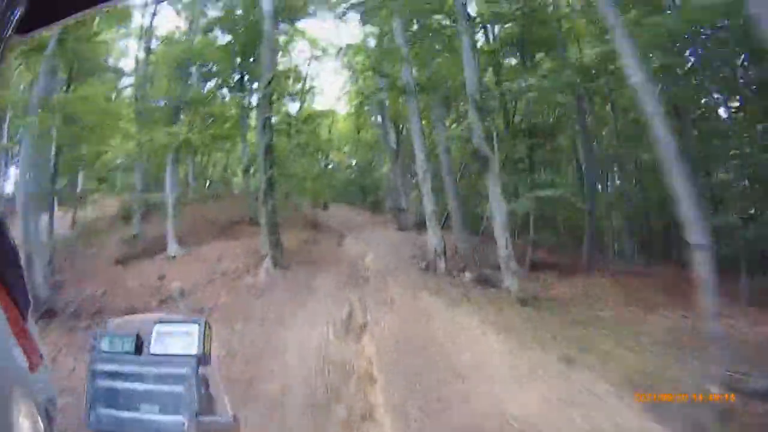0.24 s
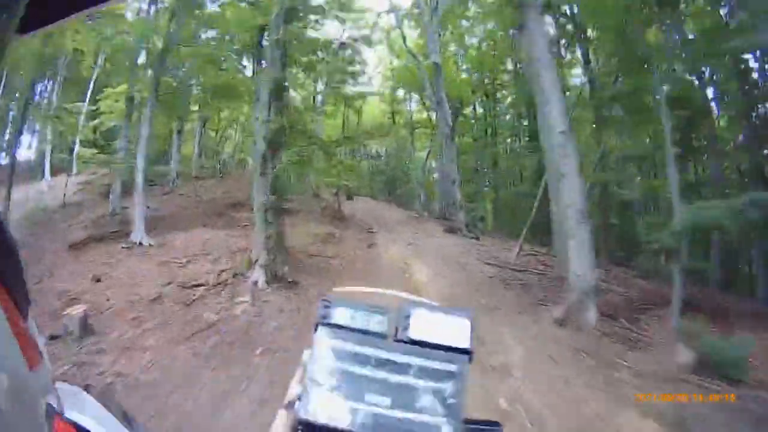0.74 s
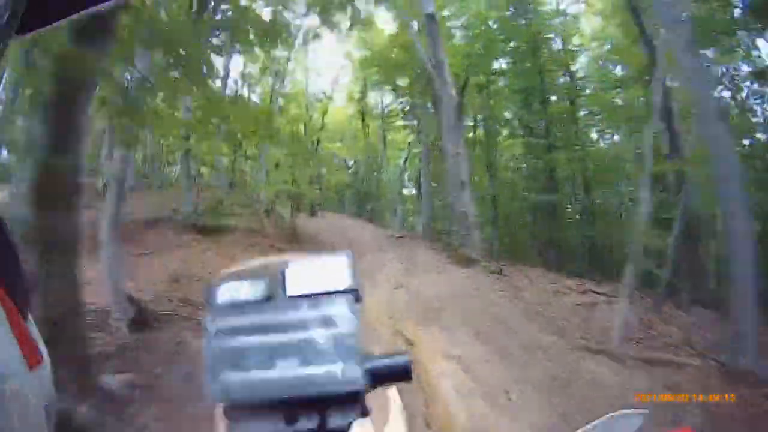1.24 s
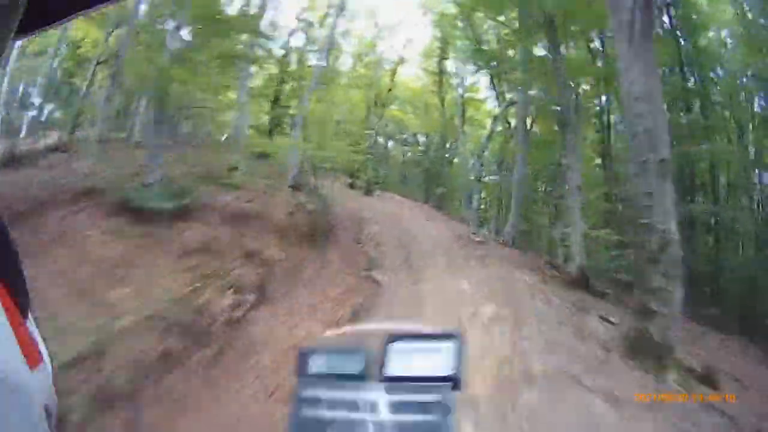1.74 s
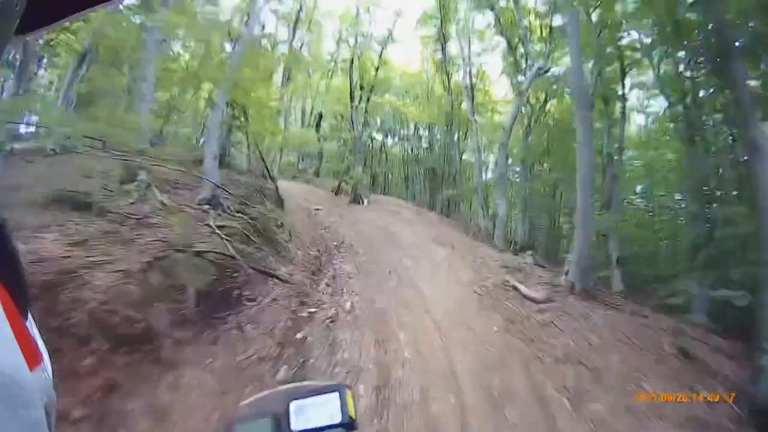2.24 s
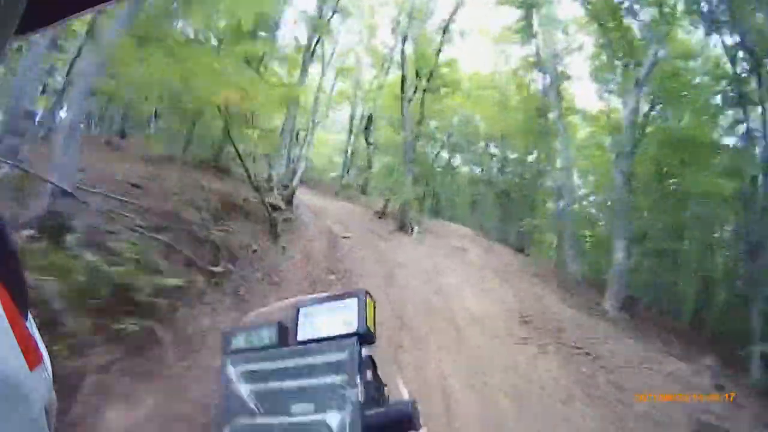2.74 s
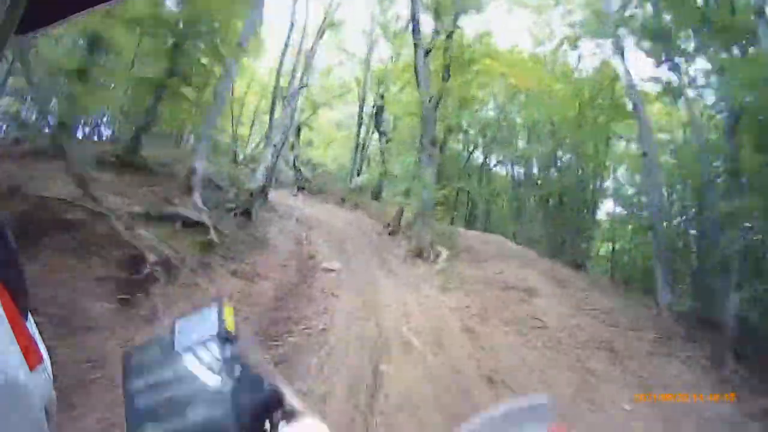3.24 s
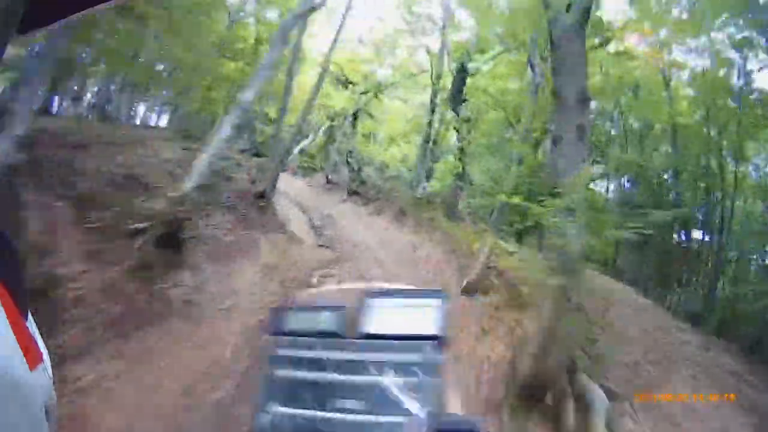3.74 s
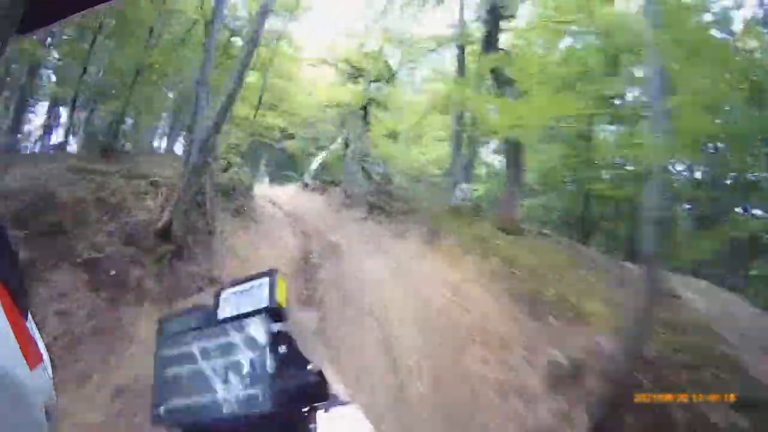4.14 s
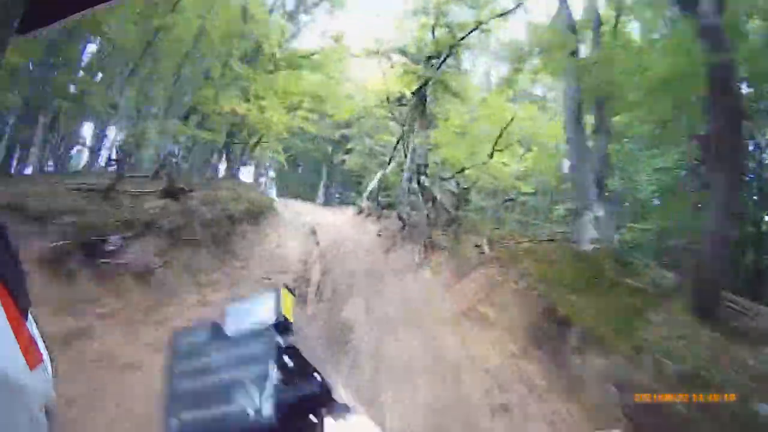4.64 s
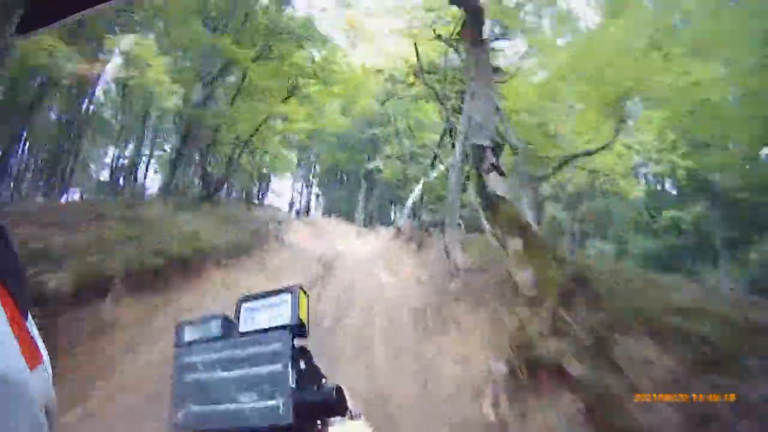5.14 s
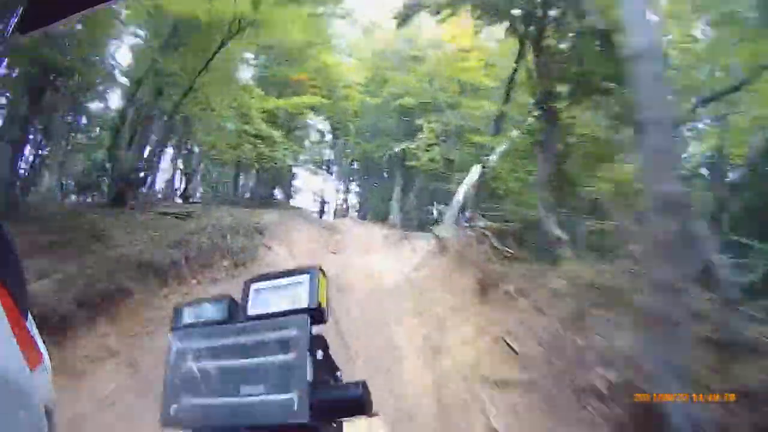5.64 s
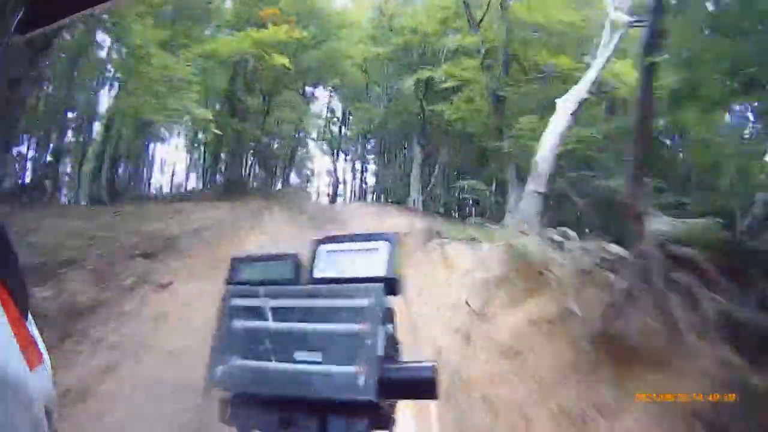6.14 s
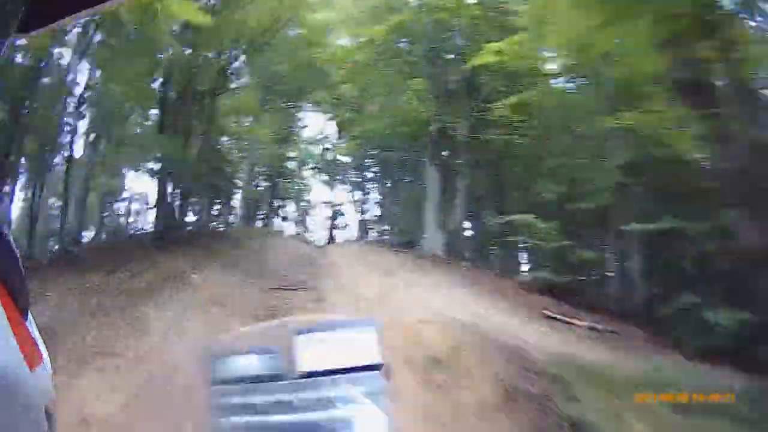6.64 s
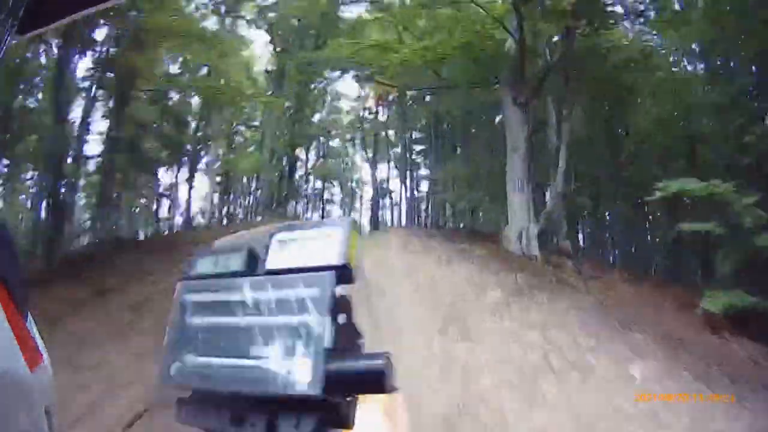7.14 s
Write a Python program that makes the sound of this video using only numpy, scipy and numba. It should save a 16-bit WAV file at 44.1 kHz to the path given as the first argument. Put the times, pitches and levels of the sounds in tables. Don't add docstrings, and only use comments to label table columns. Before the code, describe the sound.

A single-cylinder four-stroke motorcycle climbs a rough forest track, heard close through a closed case riding with the microphone. From 0 to 2 seconds the low, throaty exhaust boom pulls and rises in pitch, fluttering as the rear wheel grips and slips. Just after 2 the throttle shuts; the engine sinks into a weaker, uneven burble, with small blips around 3 to 3.5. From about 3.9 it pulls again, strengthening after 4.6 and surging to its highest, loudest revs around 5.8 to 6.2. At 6.3 it cuts sharply, stumbles, then builds to the end at 7.4. Casing rattle and airy hiss pulse with the strokes above dull wind, tyre roar and trail rumble. Soft low thuds mark bumps, notably near 0.5, 2.7, 3.9 and 6.4 to 6.7; tiny grit ticks scatter throughout. A very faint gear whine creeps upward around 4.3 to 4.6.

```python
import sys
import numpy as np
from scipy import signal
from scipy.io import wavfile
from scipy.ndimage import uniform_filter1d
from numba import njit

SR = 44100
rng = np.random.default_rng(int(sys.argv[2]) if len(sys.argv) > 2 else 0)


def rack_gain(trim_db):
    fader = np.asarray(trim_db, float)
    return 10 ** (fader / 20)


def waveform_to_disk(signal):
    frames = np.transpose(np.atleast_2d(signal))
    scaled = np.clip(frames, -1, 1) * 32767
    samples = np.round(scaled).astype(np.int16)
    wavfile.write(sys.argv[1], SR, samples)


N = 326340

# t/s, peak level/dB, centre f/Hz, ring time/s
TICKS = [(0.1083, -42.5, 5530, 0.044), (0.3702, -40, 5080, 0.018), (0.4806, -38, 4943, 0.025),
         (0.533, -40.5, 5090, 0.019), (1.0102, -40, 5120, 0.034), (1.084, -43, 4900, 0.038),
         (1.204, -35, 4273, 0.011), (1.4255, -37, 5420, 0.022), (1.4738, -38, 4620, 0.057),
         (1.538, -36, 4868, 0.026), (1.847, -36, 4648, 0.036), (2.377, -42, 5360, 0.031),
         (2.476, -48, 4330, 0.029), (3.1933, -57, 5000, 0.039), (3.2888, -43, 5193, 0.025),
         (3.4074, -40.5, 4645, 0.034), (3.916, -48, 5477, 0.016), (3.955, -38, 4548, 0.048),
         (4.171, -41, 4533, 0.035), (4.218, -49, 4930, 0.037), (4.5146, -40, 4723, 0.033),
         (4.6903, -37, 4607, 0.032), (5.0192, -48, 5154, 0.045), (5.14, -39, 5170, 0.045),
         (5.169, -37, 4736, 0.046), (5.491, -34.5, 4516, 0.049), (5.6769, -32.5, 4926, 0.023),
         (6.24, -41, 4890, 0.039), (6.6655, -31, 5310, 0.012)]
# t/s, peak level/dB, f/Hz, ring time/s
THUDS = [(0.324, -31, 149, 0.045), (0.535, -26.5, 132, 0.065), (1.44, -29, 140, 0.076),
         (2.302, -39, 139.6, 0.058), (2.576, -38, 143, 0.15), (2.699, -28, 129.2, 0.081),
         (3.006, -32, 124.6, 0.073), (3.568, -31, 122, 0.091), (3.758, -36, 145.8, 0.13),
         (3.912, -24, 131.1, 0.098), (4.11, -35, 86.8, 0.092), (4.298, -35, 142.2, 0.1),
         (4.654, -30, 112, 0.12), (5.507, -41, 118.6, 0.12), (6.415, -27, 147.2, 0.11),
         (6.599, -24.5, 147, 0.13), (6.694, -27, 138.1, 0.11), (6.899, -35, 146, 0.11)]
FULL_LOAD_DB, CRUISE_HZ = -12, 38
SNAP_LAG = -.03


@njit
def svf(x, hz, width):
    y, band, low = np.empty(len(x)), 0., 0.
    g, k = np.tan(np.pi * hz / SR), width / hz
    for i in range(len(x)):
        v = (band + g * (x[i] - low)) / (1 + g * (g + k))
        band, low, y[i] = 2 * v - band, low + 2 * g * v, k * v
    return y


def steep(x, hz, width):
    return svf(svf(x, 1. * hz, 1. * width), 1. * hz, 1. * width)


def unit(x):
    return x / np.sqrt(np.mean(x ** 2))


def ring(x, modes):
    return sum(sign * rack_gain(db) * steep(x, hz, 1.5 * width) for hz, width, db, sign in modes)


def walk(rate):
    k = int(SR / rate)
    held = np.repeat(rng.standard_normal(N // k + 1), k)
    return 1.27 * uniform_filter1d(uniform_filter1d(held, k), k)[:N]


def coloured(points, flicker_db, rate):
    hz, db = np.transpose(points)
    bands = hz[0] * 2 ** np.arange(0, np.log2(hz[-1] / hz[0]), 1 / 4)
    gains = rack_gain(np.interp(np.log(bands), np.log(hz), db))
    total = np.zeros(N)
    for f, gain in zip(bands, gains):
        total += gain * rack_gain(flicker_db * walk(rate)) * steep(rng.standard_normal(N), f, f / 3)
    return unit(total)


def follows(hz, load_db, base_db, per_load_db, db_per_hz):
    return base_db + per_load_db * (load_db - FULL_LOAD_DB) + db_per_hz * (hz - CRUISE_HZ)


def stirred(t, table, width_s):
    return np.max([np.exp(-((t - row[0]) / width_s) ** 2) for row in table], axis=0)


def knocks(table, sharp, tonal, noisy, gain_db):
    out = np.zeros(N + SR)
    t = np.arange(SR // 4) / SR
    for s, peak_db, hz, t60 in table:
        noise = unit(steep(rng.standard_normal(len(t)), hz, 1.1 * hz))
        body = tonal * np.sin(2 * np.pi * hz * t) + noisy * noise
        shape = np.minimum(t * hz / sharp, 1) * 1000. ** (-t / max(t60, .005))
        out[int(s * SR):][:len(t)] += rack_gain(peak_db + gain_db) * shape * body
    return out[:N]


def hunting(load_db):
    return rack_gain(-.5 * (load_db - FULL_LOAD_DB))


def rider(t):
    # t/s, firing rate f/Hz
    speed = [(0.0, 32.52), (0.06, 33.1), (0.14, 34.6), (0.4, 34.6), (0.52, 36.32), (0.68, 36.2),
             (0.73, 37.27), (0.83, 36.42), (1.21, 41.91), (1.36, 39.55), (1.45, 40.13), (1.54, 44.3),
             (1.62, 40.9), (1.71, 39.58), (1.79, 42.17), (1.88, 40), (1.96, 42.22), (2.08, 39.53),
             (2.19, 38.93), (2.4, 35.85), (2.61, 35.52), (2.77, 33.38), (3.03, 38.43), (3.08, 37.6),
             (3.18, 38.63), (3.54, 33.7), (3.77, 33.6), (3.92, 36.27), (4.08, 34.08), (4.13, 35.34),
             (4.18, 35.14), (4.25, 36.35), (4.39, 34.64), (4.48, 34.76), (4.58, 36.5), (4.69, 36.04),
             (4.73, 35.17), (4.81, 35.0), (4.92, 35.5), (5.05, 38.97), (5.17, 39.23), (5.22, 37.37),
             (5.28, 38.04), (5.41, 35.07), (5.52, 38.8), (5.65, 39.48), (6.0, 48.87), (6.18, 48.05),
             (6.25, 45.34), (6.33, 37.73), (6.4, 35.08), (6.55, 37.68), (6.67, 36.25), (6.83, 40.96),
             (6.9, 40.4), (6.97, 42.6), (7.03, 41.08), (7.22, 41.9), (7.3, 44.8), (7.4, 44.34)]
    # t/s, load level/dB, lean of the boom toward its lower multiple/dB
    throttle = [(0, -15, -9), (.3, -16.5, -4.5), (.62, -16, -4.5), (.82, -14, -5), (1, -13.5, 3),
                (1.2, -12.5, 6), (1.38, -12.5, -2), (1.559, -12.5, 9.5), (1.69, -13.5, 1.5), (1.86, -11, 3),
                (1.96, -13, 7), (2.01, -19, -11), (2.05, -27, -7), (2.09, -30, 7), (2.17, -27.5, 13),
                (2.26, -23.5, -13.5), (2.44, -24, -11), (2.509, -24, -17), (2.72, -25, -5),
                (2.93, -19, -6.5), (3.11, -22, -9.5), (3.181, -18.5, -8.5), (3.269, -16, 7),
                (3.37, -19, -15), (3.65, -24, -5), (3.79, -19.5, -13), (3.86, -22.5, -8), (3.93, -17.5, -2),
                (4.08, -16, -14), (4.14, -17, -7), (4.2, -16.5, -6), (4.319, -17, -2), (4.38, -16, -10.5),
                (4.58, -18, 2.5), (4.66, -13.5, -6.5), (4.76, -12, -7.5), (4.99, -12.5, -3),
                (5.05, -12, 10), (5.109, -14.5, 6), (5.16, -13.5, 1.5), (5.26, -13.5, 5), (5.41, -12.5, -8),
                (5.53, -11.5, 5.5), (5.66, -11, 6.5), (5.82, -8, 12.5), (5.95, -10, 13), (6.1, -12.5, 18.5),
                (6.255, -10, 15.5), (6.275, -20.5, 4), (6.33, -17, -11), (6.411, -24, -4),
                (6.47, -16.5, -11), (6.671, -18.5, 7.5), (6.83, -14.5, -7), (6.95, -12, 5), (7.1, -10.5, 5),
                (7.24, -11.5, 9), (7.3, -10.5, 14), (7.4, -9.5, 12)]
    # t/s, gulp strength against the pop [-1 to 1], snap level of the pop/dB
    breath = [(0, 0.71, -0.5), (.4, 0.99, -0.5), (.62, 0.98, -8), (.72, 0.22, 3), (.84, 0.46, -6),
              (1.03, 1, 0), (1.15, 0.62, 0), (1.24, -0.31, -4.5), (1.37, 1, 2), (1.55, 0.17, 2),
              (1.69, 0.79, 0), (1.8, 0.21, 2), (1.96, -0.073, 3), (2.13, -0.15, -1), (2.5, 0.11, -0.5),
              (2.93, -0.26, 3.5), (3.1, 0.0023, -3.5), (3.25, -0.65, 1), (3.6, 0.46, -9),
              (3.93, -0.016, -0.5), (4.08, 0.52, -2), (4.15, 0.068, 1.5), (4.4, 0.054, 1.5),
              (4.58, 0.027, 2), (4.66, 0.38, -2), (4.76, 0.45, -1), (4.99, 0.69, 1), (5.05, -0.031, 3),
              (5.27, -0.0052, 3.5), (5.34, 0.57, 0), (5.45, 0.43, 3.5), (5.6, 0.84, 2), (5.73, 0.9, -1),
              (5.85, 0.89, -0.5), (5.98, 0.28, -0.5), (6.2, -0.23, 1.5), (6.31, -0.18, 1.5),
              (6.5, -0.22, 1), (6.68, -0.086, 3.5), (6.83, -0.33, -0.5), (7.05, 0.029, -0.5),
              (7.24, 0.36, 2), (7.32, -0.063, -4), (7.4, -0.2, 6)]
    hand_s, load_db, lean_db = np.transpose(throttle)
    load_db, lean_db = np.interp(t, hand_s, load_db), np.interp(t, hand_s, lean_db)
    breath_s, gulp, snap_db = np.transpose(breath)
    gulp_leak = 0.12
    gulp = np.clip(np.interp(t, breath_s, gulp) - gulp_leak, -.9, .99)
    hz = np.interp(t, *np.transpose(speed)) + .05 * walk(11) * hunting(load_db)
    controls = hz, load_db, lean_db, np.interp(t, breath_s, snap_db), gulp
    return [uniform_filter1d(c, size=500) for c in controls]


def boom_multiples(load_db, lean_db, gulp):
    k = np.array([[6], [7], [8]])
    uneven_db = .9 * hunting(load_db) * np.array([walk(16) for _ in k])
    share = (1 + gulp * (-1) ** k) * rack_gain(lean_db * (7 - k) / 2) * rack_gain(uneven_db)
    return load_db + 10 * np.log10(share ** 2 / np.sum(share ** 2, axis=0))


def crank(hz, slack):
    turns = np.cumsum(hz) / SR
    chance = rng.standard_normal((N // 400, 2))[turns.astype(int)].T
    size = uniform_filter1d(rack_gain(.8 * slack * chance[0]), size=300)
    turns = turns + uniform_filter1d(.007 * slack * chance[1], size=600)
    return turns + .011 * walk(18), size


def exhaust(hz, turns, slack, boom_db, boom, bark_db):
    # f/Hz, level/dB of the multiples outside the boom
    pipe = [(40, -42), (80, -26.5), (120, -28.5), (165, -28), (205, -13.5), (260, 1), (320, -5.5),
            (360, -16), (430, -13), (500, -11), (600, -16.5), (800, -28.5), (950, -27.5), (1150, -24.5),
            (1450, -36.5)]
    # multiple of the cycle rate, level/dB
    trim = [(2, -1), (3, -8.5), (4, -1.5), (5, 0), (9, -4.5), (10, 1.5), (11, 4.5), (12, -3), (13, 3.5),
            (14, -3)]
    # t/s, lead of the seventh multiple/turns
    sway = [(0, .25), (.6, .27), (.72, .72), (.98, .72), (1.1, 1.19), (1.4, 1.19), (1.55, 1.12),
            (1.98, 1.1), (2.1, .95), (3.95, .97), (4.08, 1.27), (4.58, 1.27), (4.68, 1.75), (4.98, 1.7),
            (5.08, 2.12), (5.2, 2.12), (5.28, 1.7), (5.58, 1.68), (5.7, 2.03), (6.2, 1.95), (6.5, 2.05),
            (6.95, 2.09), (7.1, 2.16), (7.4, 2.16)]
    pipe_hz, pipe_db = np.transpose(pipe)
    warble = np.interp(np.arange(N) / SR, *np.transpose(sway))
    strongest = dict(zip((6, 7, 8), boom_db))
    ninth_db = -0.13 * (boom_db[0] - boom_db[2])
    total = 0
    for k in range(1, 35):
        if k in strongest:
            level = rack_gain(strongest[k])
        else:
            shape_db = np.interp(np.log(k * hz), np.log(pipe_hz), pipe_db) + dict(trim).get(k, 0)
            shape_db = shape_db + (k == 9) * ninth_db
            level = (boom if k < 10 else rack_gain(bark_db)) * rack_gain(shape_db + .07 * k * walk(12))
        wander = .001 * k * walk(25) + (.25 if k < 10 else .15) / k * walk(4)
        if k < 10:
            lead = {5: .3, 7: warble, 9: .38 / slack}.get(k, .1 * k ** 2 * (k < 5))
        else:
            lead = -SNAP_LAG * k - .02 * min(k - 12, 5) ** 2 + .13 * (k % 2) * (k < 22)
        phase = k * (2 * np.pi * turns + wander) + 2 * np.pi * lead
        total = total + np.sqrt(2) * level * np.cos(phase)
    return total


def strokes(turns):
    pop = 0.79 * np.exp(-((turns - SNAP_LAG + .12) % 1) / 0.33)
    gulp = .5 * np.exp(-((turns - SNAP_LAG - .5) % 1) / 0.13)
    return 0.5 + pop + gulp


def gas_churn(gate, slack, boom):
    # f/Hz, width/Hz, level/dB, sign
    gas = [(226, 71, -6, 0.73), (293.4, 15, -5, -2.2), (486, 140, -9, 0.93)]
    return rack_gain(-16) * slack ** .8 * boom * unit(ring(np.sqrt(gate) * rng.standard_normal(N), gas))


def casing_rattle(gate, level_db):
    # f/Hz, width/Hz, level/dB, sign
    casing = [(1115, 170, 0, 0.95), (1224, 310, -5, -0.61), (764, 95, 0, -0.47), (454.6, 160, 4, 1),
              (1024, 100, -4.5, -0.84), (899, 140, -8, 0.99), (1456, 240, -10.5, 1),
              (1624, 220, -21.5, -1.1), (2247, 292, -18.5, 0.93), (3736, 220, -25.5, -0.7)]
    grains = rack_gain(2 * walk(60)) * rng.standard_normal(N)
    return rack_gain(level_db + 4.0) * unit(ring(gate * grains, casing))


def engine(hz, boom_db, bark_db, rattle_db):
    boom = np.sqrt(np.sum(rack_gain(2 * boom_db), axis=0))
    slack = np.clip(rack_gain(FULL_LOAD_DB - 2) / boom, 1, 3)
    turns, size = crank(hz, slack)
    gate = strokes(turns)
    pops = size * exhaust(hz, turns, slack, boom_db, boom, bark_db)
    return pops + gas_churn(gate, slack, boom) + casing_rattle(gate, rattle_db), gate


def gas_hiss(t, hz, load_db, jolt_db, gate):
    # f/Hz, level/dB per Hz
    spectrum = [(880, -30.5), (1500, -1.5), (1770, -5.5), (1960, -8), (2280, -12), (3120, -16),
                (3750, -14.5), (8080, -33), (11000, -39.5), (14300, -61), (22000, -120)]
    late_db = np.interp(t - 0.058, t, load_db)
    level_db = follows(hz, late_db, -47, per_load_db=0.51, db_per_hz=0.2) + jolt_db + 7.0
    hiss = unit(gate ** 0.5 * coloured(spectrum, flicker_db=1.7, rate=8))
    return rack_gain(level_db + 0.57 * walk(18)) * hiss


def wind_roar():
    # f/Hz, level/dB per Hz
    spectrum = [(15, -46), (25, -24.5), (129, -13.5), (248, 1), (381, -2), (519, -7), (585, -13.5),
                (945, -16), (1180, -20.5), (1500, -21), (1950, -53), (3300, -120)]
    return rack_gain(-27.5) * coloured(spectrum, flicker_db=1.6, rate=8.9)


def trail_rumble(t, hz, load_db):
    noise = rng.standard_normal(N) * rack_gain(1.8 * walk(14))
    shake_db = 5 * stirred(t, THUDS, width_s=0.057)
    level_db = follows(hz, load_db, -35.5, per_load_db=0.19, db_per_hz=0.082) + shake_db - 1.5
    return rack_gain(level_db) * unit(svf(svf(noise, 140.0, 98.0), 87.0, 130.))


def grit_ticks():
    return knocks(TICKS, sharp=6, tonal=0, noisy=1, gain_db=-4)


def bump_thuds():
    return knocks(THUDS, sharp=0.69, tonal=1, noisy=0.54, gain_db=3.0)


def gear_whine(t):
    start, end = 4.3, 4.58
    swell = np.clip(np.minimum(t - start, end - t) / .04, 0, 1) * rack_gain(-54.5 + 1.8 * walk(15))
    hz = np.interp(t, [start, end], [3650, 3735]) + 8 * walk(25)
    return swell * np.sin(2 * np.pi * np.cumsum(hz) / SR)


def scene():
    t = np.arange(N) / SR
    hz, load_db, lean_db, snap_db, gulp = rider(t)
    jolt_db = 0 * stirred(t, TICKS, width_s=.07)
    boom_db = boom_multiples(load_db, lean_db, gulp)
    bark_db = follows(hz, load_db, -18.5, per_load_db=0.76, db_per_hz=-0.19) + snap_db + 1.0 * walk(11)
    rattle_db = follows(hz, load_db, -27, per_load_db=0.33, db_per_hz=0.28)
    rattle_db = rattle_db + 0.46 * jolt_db + 1.0 * walk(9.9)
    bike, gate = engine(hz, boom_db, bark_db, rattle_db)
    air = gas_hiss(t, hz, load_db, jolt_db, gate) + wind_roar()
    trail = trail_rumble(t, hz, load_db) + grit_ticks() + bump_thuds()
    fade_in = np.minimum(t / .004, 1)
    return (fade_in * (bike + air + trail + gear_whine(t)))[None]


def coarse_treble(x, coarse):
    hz, _, z = signal.stft(x, SR, "cosine", 2048, boundary="odd", padded=False)
    size = np.abs(z) + 1e-12
    bands = rng.standard_normal((len(hz) // 16 + 1, z.shape[-1]))
    bands = np.repeat(bands, 16, axis=0)[:len(hz)]
    bands = uniform_filter1d(bands, size=2, axis=1)
    tilt = np.clip(hz[:, None] / 7000, .05, 1)
    step = coarse * tilt * rack_gain(4.2 * bands) * uniform_filter1d(size, size=32, axis=-2)
    rounded = z * np.round(size / step) * step / size
    out = signal.istft(rounded, SR, "cosine", 2048)[1]
    return np.concatenate([out, x[:, out.shape[1]:]], axis=1)


def low_pass(x):
    return signal.sosfilt(signal.butter(12, 16830, fs=SR, output="sos"), x)


def record(dry):
    drive = uniform_filter1d(np.abs(dry), size=4000)
    hissy = dry + rack_gain(-66.5) * (1 + 7 * drive) * rng.standard_normal(dry.shape)
    soft = np.tanh(.8 * hissy) / .8
    top_cut = signal.ellip(10, .2, 80, 15700, fs=SR, output="sos")
    mix = signal.sosfilt(top_cut, coarse_treble(soft, coarse=2.3))
    return low_pass(mix)


dry = scene()
out = record(dry)
waveform_to_disk(out)
```